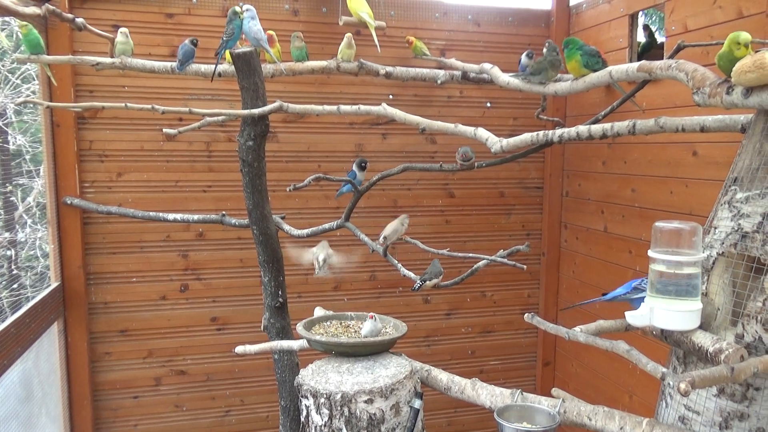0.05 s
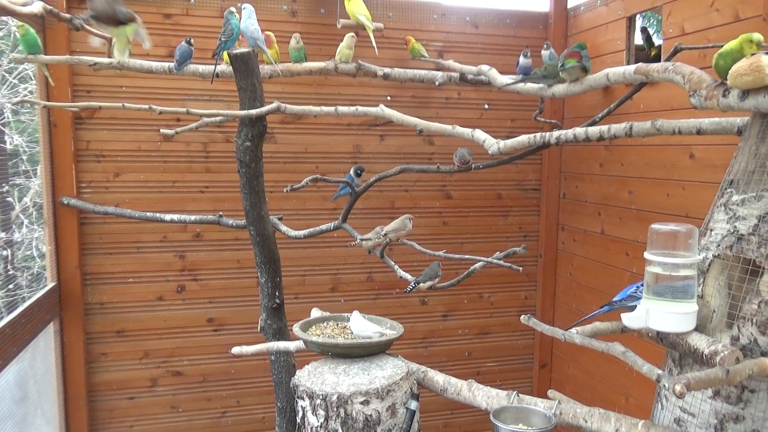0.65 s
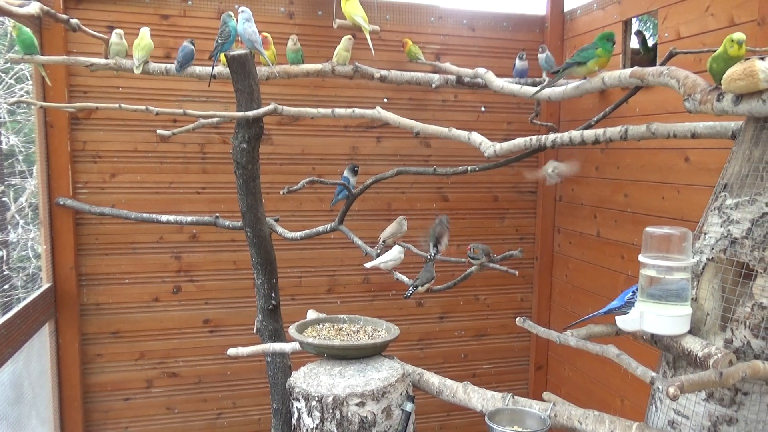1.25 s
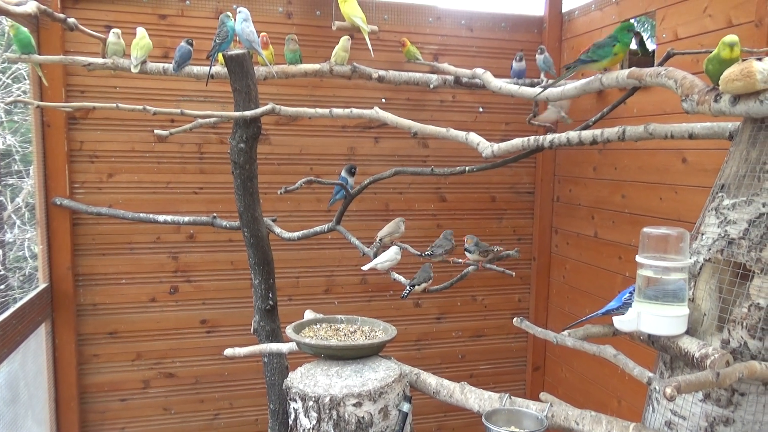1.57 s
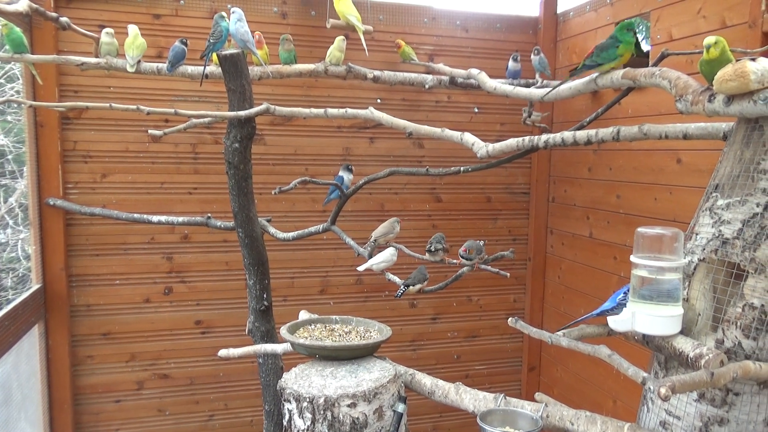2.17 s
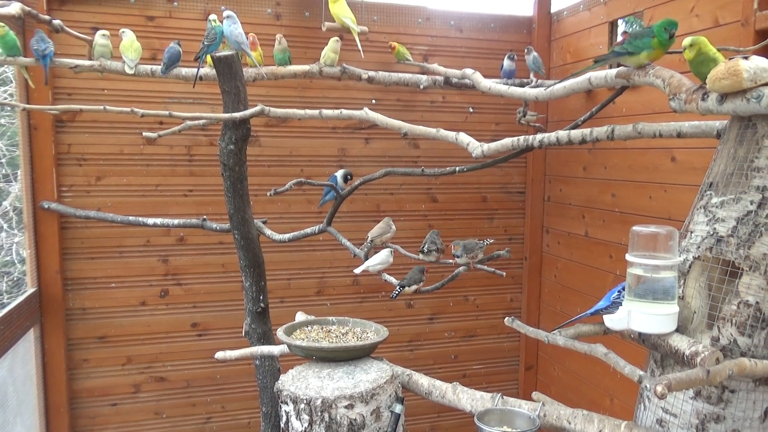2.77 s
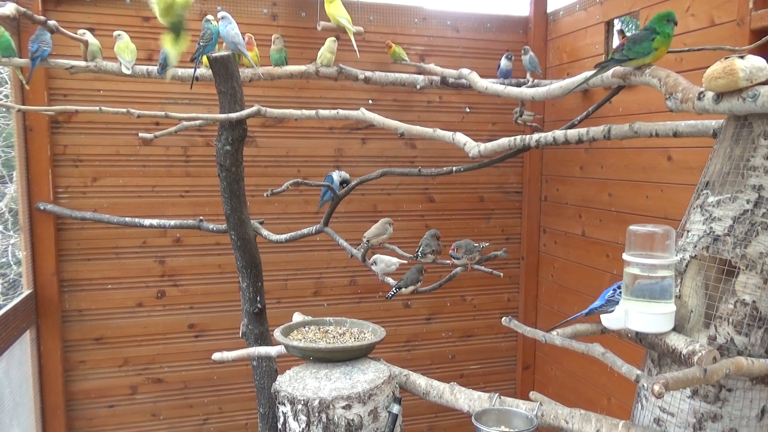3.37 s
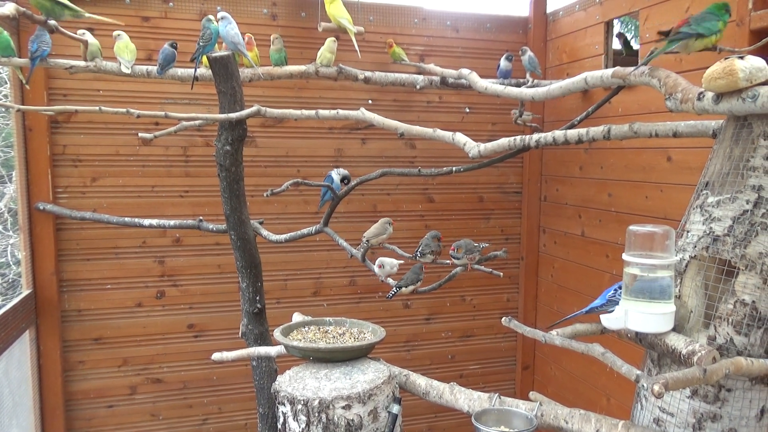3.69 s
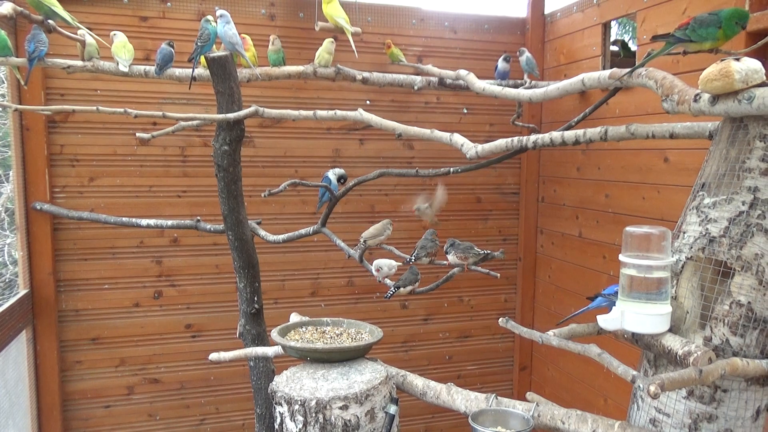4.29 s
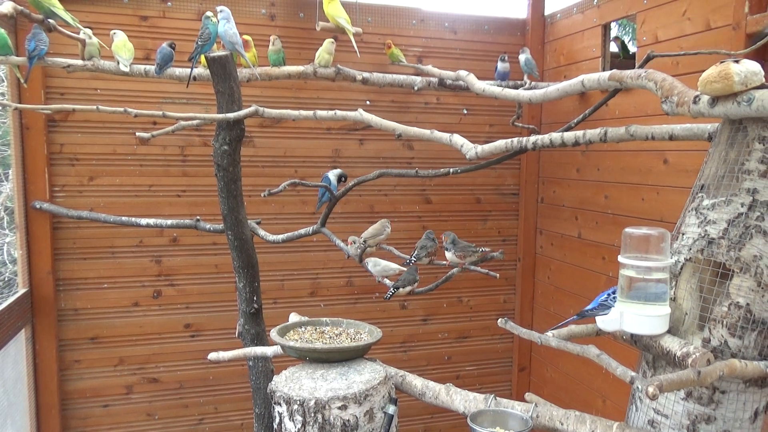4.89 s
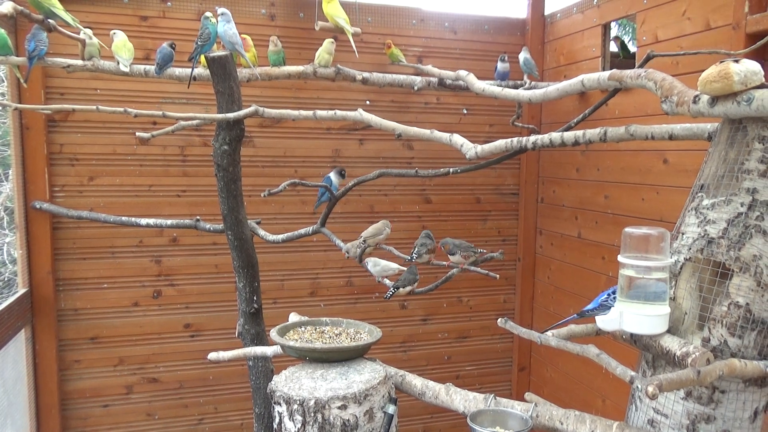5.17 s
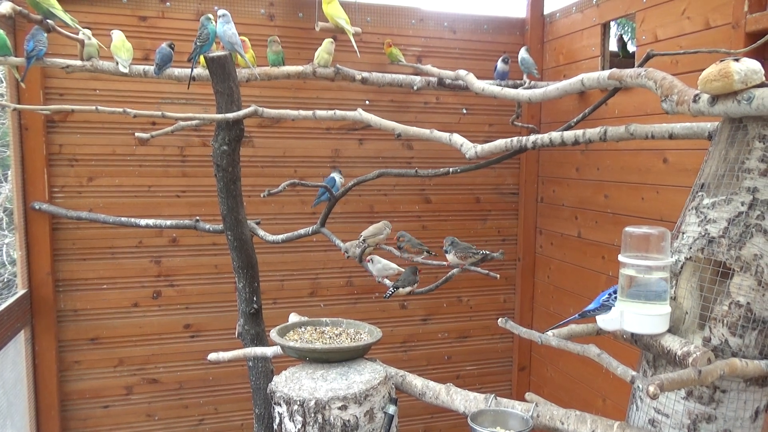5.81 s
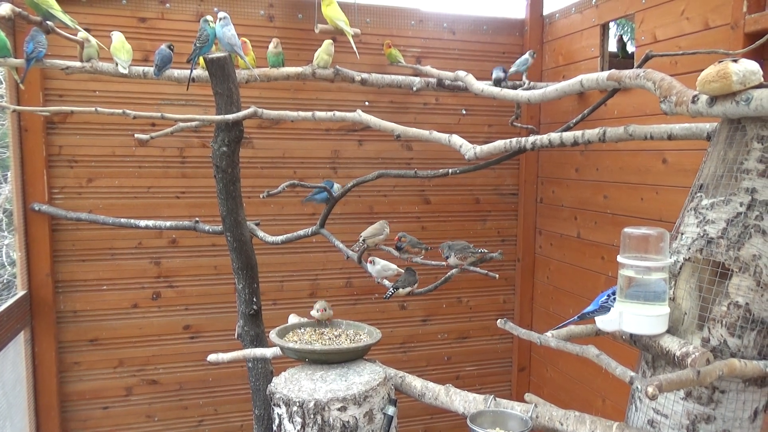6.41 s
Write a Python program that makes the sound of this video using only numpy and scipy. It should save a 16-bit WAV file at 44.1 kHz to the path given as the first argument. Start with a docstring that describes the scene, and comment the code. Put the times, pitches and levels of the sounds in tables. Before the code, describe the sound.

Budgerigars chirp, squeak and warble in a wooden aviary, with soft finch beeps, faint wing flutters and distant flock chatter.

```python
"""Budgerigars chatter in a wooden aviary, with a few small finches among them.
Each voice is a vibrating membrane heard through the throat: arched chirps turn rough as they fall,
squeaks flip up into shrill whistles, and rasps, nasal finch beeps, clucks and warbles come between.
Wings flutter, a finch lands in the seed dish, and the flock murmurs farther off in a soft hush of air.
The plank walls add a short bright ring."""
import sys
import numpy as np
from scipy import signal
from scipy.fft import rfft, irfft
from scipy.io import wavfile
from scipy.ndimage import uniform_filter1d, map_coordinates

SR = 44100
rng = np.random.default_rng(int(sys.argv[2]) if len(sys.argv) > 2 else 0)


def file_out(sig):
    """Save sig as 16-bit WAV at sys.argv[1]."""
    # one column per channel
    cols = np.atleast_2d(sig).T
    # limit, then scale
    lim = np.clip(cols, -1, 1)
    pcm = np.round(lim * 32767).astype(np.int16)
    wavfile.write(sys.argv[1], SR, pcm)


N = 293265
TIME = np.arange(N) / SR


def from_db(db):
    """Turn decibels into a number to multiply by."""
    return 10 ** (np.asarray(db) / 20)


def unit_power(x):
    """Scale a sound to an average power of 1."""
    return x / np.sqrt(np.mean(x ** 2) + 1e-20)


def at_hz(colour, hz):
    """Look up the level at a frequency in a tone colour table."""
    f, db = np.transpose(colour)
    return np.interp(np.log(np.maximum(hz, 1)), np.log(f), db)


def noise(colour):
    """Noise with the given tone colour, as long as the scene."""
    gain = from_db(at_hz(colour, np.fft.rfftfreq(N, 1 / SR)))
    return unit_power(irfft(rfft(rng.standard_normal(N)) * gain, N))


def drift(rate, t):
    """A smooth random wobble that changes `rate` times a second."""
    return map_coordinates(rng.standard_normal(8192), [(t - t[0]) * rate], order=2, mode="wrap")


def gate(t, start, end, rise, fall):
    """Fade in before the start and fade out after the end."""
    ramp = np.minimum((t - start) / rise + 1, (end - t) / fall + 1)
    return np.sin(np.pi / 2 * np.clip(ramp, 0, 1)) ** 2


def around(start, end):
    """The sample times of a note, with a little extra on both sides."""
    return TIME[max(0, int((start - .02) * SR)):int((end + .02) * SR)]


def add(track, t, sound):
    """Mix a sound into a track at its own time."""
    first = round(t[0] * SR)
    track[first:first + len(t)] += sound


def voice_box(t, hz, rough, throat, buzz_hz, swing, flutter, waver, count, bright_db=0):
    """A membrane vibrates; a slower, uneven buzz shakes its pitch (swing) and strength (flutter)."""
    buzz = np.sin(2 * np.pi * np.cumsum(buzz_hz * (1 + 0.3265 * drift(250, t))) / SR)
    shake = rough * (1.61 * buzz + 0.725 * drift(1100, t))
    phase = 2 * np.pi * np.cumsum(hz * (1 + swing * shake + waver * drift(171.65, t))) / SR
    k = np.arange(1, count + 1)[:, None]   # 1 is the note itself, the rest are its overtones
    # the throat favours some overtones; the total power stays even
    gains = from_db(at_hz(throat, k * hz) + bright_db * (k > 1)) * (k * hz < .45 * SR)
    gains /= np.sqrt(np.sum(gains ** 2, axis=0) / 2)
    tone = np.sum(gains * np.sin(k * phase + rng.uniform(0, 2 * np.pi, (count, 1))), axis=0)
    return tone * unit_power(np.exp(flutter * shake))


# Tone colour of a chirping throat: f/Hz, level/dB
CHIRP_THROAT = [(4000, 3), (5500, -9), (7700, -9), (9500, -19.5), (11700, -13), (13500, -31), (16000, -24),
                (19000, -65)]
# Budgerigar chirps: t/s, rise/s, fall/s, tail/s, top f/Hz, low f/Hz,
# top level/dB, fall level/dB, tail level/dB, hoarseness/0-1, overtone boost/dB
CHIRPS = [ (0.0, 0.08, 0.046, 0.057, 3878, 2960, -20.5, -19, -20, 0.4, 3),
          (0.514, 0.025, 0.081, 0.06, 3890, 2777, -24, -21, -18, 0.84, -7),
          (0.808, 0.05, 0.059, 0.019, 3932, 2903, -15.5, -15.5, -28, 0.04, -2.5),
          (1.095, 0.031, 0.074, 0.0045, 4037, 3000, -20, -24, -34, 0, -2),
          (1.438, 0.0074, 0.065, 0.068, 3820, 2604, -32.5, -23.5, -24.5, 0.4, 5),
          (1.525, 0.051, 0.047, 0.019, 3830, 2840, -19, -20, -21, 0.09, -1),
          (1.828, 0.048, 0.093, 0.08, 4045, 2780, -21, -21, -25.5, 0.05, 0.5),
          (2.25, 0.053, 0.031, 0.0117, 3912, 2740, -18, -28, -12, 0.18, 0.5),
          (2.435, 0.022, 0.051, 0.026, 3750, 3034, -29, -28.5, -23, 0.66, 4),
          (2.491, 0.017, 0.046, 0.13, 4390, 2843, -25, -21.5, -25.5, 0.46, 6),
          (2.535, 0.059, 0.059, 0.018, 3992, 3397, -20.5, -22.5, -23, 0.35, -0.5),
          (2.657, 0.015, 0.044, 0.0029, 4640, 4350, -16, -23, -60, 0.12, 5),
          (2.725, 0.006, 0.046, 0.059, 3825, 2766, -26.5, -17, -18, 0, -1.5),
          (2.897, 0.042, 0.074, 0.066, 3914, 2427, -12.5, -20, -31.5, 0.06, 0.5),
          (3.064, 0.0088, 0.055, 0.081, 4150, 2784, -42.5, -24.5, -21, 0.45, 0.5),
          (3.337, 0.0087, 0.06, 0.079, 3763, 2603, -30.5, -23, -23.5, 0.15, -1),
          (3.868, 0.016, 0.084, 0.019, 4670, 2928, -13, -22, -18.5, 0.48, 1.5),
          (4.017, 0.033, 0.06, 0.0097, 3943, 2920, -19.5, -21.5, -28.5, 0.28, -2),
          (4.253, 0.0067, 0.058, 0.058, 4070, 2684, -28.5, -33.5, -25, 0.24, 2.5),
          (4.706, 0.0131, 0.056, 0.05, 3627, 2785, -31, -26.5, -25, 0.59, 2.5),
          (4.91, 0.011, 0.081, 0.0029, 3504, 2640, -33.5, -41, -44, 0.4, 3.5),
          (5.951, 0.026, 0.011, 0.11, 3840, 2700, -33.5, -46, -35, 0.07, 6.5),
          (6.057, 0.0077, 0.049, 0.037, 3606, 2810, -40, -32, -45, 0.54, 6.5),
          (6.539, 0.043, 0.051, 0.039, 3905, 2860, -23, -20.5, -31, 0.12, -1.5)]


def chirps(crack_hz=3330, trill_hz=160.1):
    """The voice climbs to a clear top, cracks on the way down, then lingers low and rough."""
    out = np.zeros(N)
    for s, rise, fall, tail, top, low, top_db, fall_db, tail_db, hoarse, edge_db in CHIRPS:
        peak, trough, end = s + rise, s + rise + fall, s + rise + fall + tail
        t = around(s, end)
        up = np.clip((t - s) / rise, 0, 1)
        down = np.clip((t - peak) / fall, 0, 1)
        linger = np.clip((t - trough) / tail, 0, 1)
        scoop = 0.21 * np.tanh(rise / 0.026) ** 2   # quicker rises start nearer the top
        arch = top * (1 - scoop * (1 - up) ** 2.6) + (low - top) * np.sin(np.pi / 2 * down) ** 2
        pitch = arch + low * (0.098 * np.sin(np.pi * linger) ** 2 + 0.0324 * linger)
        level = np.interp(t, [s, s + 0.45 * rise, peak, peak + fall / 2, trough, trough + tail / 2, end],
                          [top_db - 11, top_db, top_db, fall_db, tail_db - 4, tail_db, tail_db - 11])
        rough = np.interp(t, [s, peak, peak + fall / 2, trough], [hoarse, 0.24 * hoarse, 0.2, 0.18])
        crack = np.sin(np.pi * down) * np.exp(-((pitch - crack_hz) / 150) ** 2)
        # louder and higher is brighter; the fall is duller
        bright_db = edge_db + 0.033 * (level + 4.5) + 5 * (.5 - down) + 11 * np.log2(pitch / 3700)
        # the low end throbs in pitch and level
        trill = down ** 2 * np.sin(2 * np.pi * trill_hz * t + drift(trill_hz / 2, t))
        voice = voice_box(t, pitch * (1 + 0.03 * trill), 0.6 * rough + 0.34 * crack, CHIRP_THROAT,
                          buzz_hz=525.4, swing=0.26, flutter=0.021, waver=0.01507, count=5,
                          bright_db=bright_db)
        gain = from_db(level + 1.5 * trill + 12 * rough * drift(124.7, t))
        add(out, t, voice * gain * gate(t, s, end, 0.009, 0.0047))
    return out


# Tone colour of the background air: f/Hz, level/dB
AIR = [(25, -6.5), (90, 7), (190, -8), (1500, -7), (3800, -11), (10000, -37), (18000, -40)]


def air(level_db=-56):
    """A steady, soft hush, a little louder on the right."""
    sides = np.array([[1], [-1]])
    return from_db(level_db) * (noise(AIR) * from_db(-1.2 * sides) + 0.17 * noise(AIR) * sides)


# Tone colour of a warbling throat: f/Hz, level/dB
WARBLE_THROAT = [(250, -24.5), (1800, -1.5), (3200, -7.5), (5000, -25), (9000, -19), (15000, -62)]


def warble(t, hz, rough):
    """The throaty, buzzing voice of a budgerigar's song, near or far."""
    return voice_box(t, hz, rough, WARBLE_THROAT,
                     buzz_hz=331.4, swing=0.203, flutter=0.6, waver=0.0143, count=4)


# Tone colour of blurred, distant chatter: f/Hz, level/dB
MURMUR = [(250, -14.5), (1000, -9.5), (2000, -24.5), (5000, -13), (10000, -21.5), (15000, -41)]
# How the distant flock swells and fades: t/s, level/dB
FLOCK_LEVELS = [(0, -51), (1.75, -56.5), (3.55, -47), (3.85, -56), (4.9, -53), (5.35, -66), (5.5, -60.5),
                (6.1, -50.5), (6.4, -53.5)]


def far_flock(notes=170):
    """Distant birds warble short random glides over a blur of chatter."""
    song = np.zeros(N)
    for when, length, pitch, loud, rough in rng.random((notes, 5)):
        s = when * TIME[-1]
        t = around(s, s + 0.06 * length)
        hz = 1100 * 2.6 ** pitch * np.exp(0.13 * drift(45.98, t))
        add(song, t, warble(t, hz, 0.706 * rough) * np.hanning(len(t)) * from_db(5 * loud))
    blur = unit_power(noise(MURMUR) * from_db(5 * np.tanh(drift(28, TIME))))
    swell = from_db(np.interp(TIME, *np.transpose(FLOCK_LEVELS)))
    return (from_db(-4.5) * blur + from_db(-3.5) * unit_power(song)) * swell


# Tone colour of a whistling throat: f/Hz, level/dB
WHISTLE_THROAT = [(5000, 10), (7000, -10.5), (10300, 11.5), (12400, -13.5), (14000, -35.5)]


def whistle(track, s, length, first, last, db, rough, leap=0, settle_s=0.011):
    """Add a high, nearly pure tone with its octave; it settles quickly toward its last pitch."""
    t = around(s, s + length)
    pitch = last + (first - last) * np.exp(-np.maximum(t - s, 0) / settle_s)
    pitch *= 1 - leap * np.clip((s - t) / 0.0022 + .5, 0, 1)   # a leap shoots up from below
    voice = voice_box(t, pitch, rough, WHISTLE_THROAT,
                      buzz_hz=400.3, swing=0.11, flutter=0.21, waver=0.0111, count=2)
    add(track, t, voice * from_db(db) * gate(t, s + 0.00033, s + length - .004, 0.003, 0.0091))


# Shrill pips: t/s, length/s, first f/Hz, last f/Hz, level/dB, roughness/0-1
PIPS = [(0.15, 0.039, 5100, 6870, -30, 0.4), (2.449, 0.034, 5770, 5200, -29, 0.42),
        (2.634, 0.018, 4900, 5900, -31, 0), (3.886, 0.015, 5780, 6500, -14.5, 0.6),
        (4.234, 0.013, 6160, 5530, -20, 0.48), (4.295, 0.026, 6500, 4700, -23, 0.21),
        (5.779, 0.019, 5550, 4670, -49, 0.02), (6.33, 0.014, 5420, 5110, -21.5, 0.08)]


def pips():
    """Tiny whistles on their own, each bending up or down."""
    out = np.zeros(N)
    for pip in PIPS:
        whistle(out, *pip)
    return out


# Tone colours of a rasp's shrill part and throaty part: f/Hz, level/dB
RASP_SHRILL = [(1000, -18), (2200, -10), (4000, 1), (6500, 4), (12000, -6.5), (14500, -12.5), (19000, -46)]
RASP_THROATY = [(700, -30), (2000, -5.5), (3600, 1.5), (12000, -84)]
# Scolding rasps: t/s, length/s, shrill level/dB, throaty level/dB
RASPS = [(0.163, 0.037, -29.5, -58), (0.253, 0.028, -27, -37), (0.766, 0.016, -23.5, -40.5),
         (0.888, 0.043, -28, -40.5), (1.055, 0.04, -31, -45), (3.467, 0.024, -39, -34),
         (3.905, 0.021, -23.5, -51), (4.066, 0.018, -28, -42), (5.108, 0.006, -57, -48.5),
         (5.517, 0.01, -46.5, -41.5)]


def rasps(squeal_hz=2200):
    """A forced squeal whose pitch jumps about, wrapped in hiss."""
    out, hiss, throaty = np.zeros(N), noise(RASP_SHRILL), noise(RASP_THROATY)
    for s, length, shrill_db, throaty_db in RASPS:
        t = around(s, s + length)
        squeal = voice_box(t, squeal_hz * np.exp(0.1 * drift(330, t)), 0.17, RASP_SHRILL,
                           buzz_hz=668, swing=0.065, flutter=0.2, waver=0.018, count=7)
        shrill = from_db(-3.5) * squeal + from_db(-8) * np.interp(t, TIME, hiss)
        rasp = from_db(shrill_db) * shrill + from_db(throaty_db) * np.interp(t, TIME, throaty)
        add(out, t, rasp * from_db(2 * drift(164, t)) * gate(t, s + 0.01, s + length, 0.037, 0.018))
    return out


# Tone colour of air pushed by wings: f/Hz, level/dB
WING_RUSH = [(50, 3), (250, 0), (800, 0), (2500, -8.5), (15000, -36)]
# Short flights: t/s, length/s, rush level/dB, whirr level/dB
FLIGHTS = [(0.203, 0.032, -53.5, -82), (1.223, 0.33, -54.5, -61.5), (3.168, 0.73, -59, -62),
           (4.735, 0.022, -57.5, -75)]


def wings(beat_hz=19, whirr_hz=275):
    """Each wingbeat pushes a puff of air and sets the feathers whirring low."""
    beat = 2 * np.pi * np.cumsum(beat_hz * (1 + 0.178 * drift(3.7, TIME))) / SR
    rush, shiver = noise(WING_RUSH), drift(70, TIME)
    whirr = shiver * np.sin(2 * np.pi * np.cumsum(whirr_hz * np.exp(.13 * drift(70, TIME))) / SR)
    flying = np.zeros(N)
    for s, length, rush_db, whirr_db in FLIGHTS:
        fade = gate(TIME, s + 0.016, s + length - .12, 0.028, 0.52)
        flying += (from_db(rush_db) * rush + from_db(whirr_db) * whirr) * fade
    return unit_power(from_db(3.0 * np.sin(beat))) * flying


# Tone colour of the seed dish: f/Hz, level/dB
SEED_DISH = [(90, -12), (650, 5), (1200, -20), (5000, -64)]


def landing(start_s=0.23, fade_db_per_s=500):
    """A finch's feet hit the seed dish with a dull knock that dies away at once."""
    age = TIME - start_s
    return noise(SEED_DISH) * (age > 0) * from_db(-43.5 - fade_db_per_s * np.abs(age))


# Tone colours of a squeaking throat and of the soft thump at the flip: f/Hz, level/dB
SQUEAK_THROAT = [(2200, -2), (3300, -10.5), (4700, 6), (7000, 4.5), (9300, -0.5), (11800, 0.5),
                 (14000, -14), (18000, -33)]
FLIP_THUMP = [(30, 7), (110, -2), (300, -1.5), (700, -2), (2000, -72)]
# Squeaks: t/s, slide length/s, first f/Hz, bend f/Hz, last f/Hz, slide level/dB,
# whistle length/s, whistle f/Hz, whistle level/dB, whistle roughness/0-1
SQUEAKS = [ (0.272, 0.037, 2310, 2417, 2500, -24, 0.037, 6170, -25.5, 0.27),
           (0.458, 0.033, 2270, 2360, 2326, -22, 0.032, 6410, -13.5, 0.1),
           (0.69, 0.027, 2000, 2340, 2600, -23, 0.025, 6297, -11, 0.19),
           (0.818, 0.031, 2705, 2530, 2484, -21.5, 0.013, 6270, -12.5, 0.17),
           (0.95, 0.026, 2650, 2496, 2550, -25, 0.014, 6097, -16.5, 0),
           (1.094, 0.033, 2390, 2327, 2410, -26.5, 0.024, 6070, -19.5, 0.18),
           (4.003, 0.026, 2200, 2407, 2580, -21, 0.021, 7070, -17, 0),
           (4.132, 0.031, 2220, 2447, 2517, -21.5, 0.022, 7100, -15, 0.01),
           (4.492, 0.03, 2232, 2344, 2460, -20.5, 0.046, 6830, -19.5, 0.27),
           (5.446, 0.0061, 1900, 2000, 2170, -45, 0.019, 6830, -27, 0.06),
           (6.301, 0.02, 2260, 2034, 2576, -22.5, 0.051, 6690, -26.5, 0.25)]


def squeaks():
    """The voice starts scratchy, slides, then breaks up as it flips into a shrill whistle."""
    out, thump = np.zeros(N), from_db(-22.5) * noise(FLIP_THUMP)
    for s, slide_s, first, bend, last, db, whistle_s, whistle_hz, whistle_db, rough in SQUEAKS:
        flip = s + slide_s
        t = around(s, flip)
        pitch = np.interp(t, [s, s + 0.33 * slide_s, flip], [first, bend, last])
        breaking = np.exp(-np.abs(t - flip) / 0.0044)
        scratch = 0.4 * np.exp(-np.maximum(t - s, 0) / 0.0038) + 0.076 * breaking
        voice = voice_box(t, pitch, 0.22 + scratch, SQUEAK_THROAT,
                          buzz_hz=442.8, swing=0.076, flutter=0.44, waver=0.0057, count=7)
        voice += breaking * np.interp(t, TIME, thump)
        add(out, t, voice * from_db(db) * gate(t, s + 0.0014, flip + 0.00037, 0.0057, 0.003))
        whistle(out, flip, whistle_s, 1.0049 * whistle_hz, whistle_hz, whistle_db, rough, leap=0.16)
    return out


# Tone colour of a finch's throat: f/Hz, level/dB
FINCH_THROAT = [(450, -3), (1200, -2.5), (2400, -0.5), (3900, 15.5), (5200, 6), (7000, -3.5), (9000, -13.5),
                (11000, 1), (13500, -23)]
# Nasal finch beeps: t/s, length/s, f/Hz, level/dB, roughness/0-1
BEEPS = [(1.278, 0.06, 867, -49.5, 0.73), (1.369, 0.1, 786, -49.5, 0.37), (3.299, 0.053, 447, -57.5, 0.3),
         (3.61, 0.097, 782, -43.5, 0.16), (3.731, 0.043, 799, -48, 0.65), (5.233, 0.064, 623, -64.5, 0),
         (5.789, 0.043, 850, -54, 0.2), (6.098, 0.098, 1036, -53, 0.2)]


def finch_beeps():
    """Finches call on a low, gently arched pitch, with many overtones and a husky hiss."""
    out, husk = np.zeros(N), from_db(-5) * noise(FINCH_THROAT)
    for s, length, hz, db, rough in BEEPS:
        t = around(s, s + length)
        arch = 1 - 0.054 * (2 * (t - s) / length - 1.1) ** 2 + 0.006 * drift(58, t)
        voice = voice_box(t, hz * arch, rough, FINCH_THROAT,
                          buzz_hz=140, swing=.03, flutter=.5, waver=.005, count=32)
        voice += np.sqrt(rough) * np.interp(t, TIME, husk)
        add(out, t, voice * from_db(db) * gate(t, s + 0.015, s + length - .01, 0.046, 0.02))
    return out


# Faint low clucks: t/s, level/dB
CLUCKS = [(1.715, -55), (1.80, -53.5), (1.909, -56), (1.999, -59.5), (2.187, -57), (2.595, -54.5),
          (2.75, -57)]


def clucks(start_hz=470, glide_per_s=6):
    """Soft, hollow, hoarse notes slide up in a throaty flutter."""
    out = np.zeros(N)
    for s, db in CLUCKS:
        t = around(s, s + 0.0414)
        pitch = start_hz * np.exp(glide_per_s * (t - s) + 0.1445 * drift(199.3, t))
        phase = 2 * np.pi * np.cumsum(pitch) / SR
        voice = np.sin(phase) + 0.86 * np.sin(2 * phase) + 0.22 * np.sin(3 * phase)
        add(out, t, voice * from_db(db + 5.6 * drift(148, t)) * gate(t, s, s + 0.023, 0.0088, 0.011))
    return out


# Warbled notes between the calls: t/s, length/s, first f/Hz, last f/Hz, level/dB, roughness/0-1
WARBLES = [(2.06, 0.087, 2566, 2740, -36, 0.23), (2.796, 0.067, 2535, 2130, -31, 0.21),
           (3.28, 0.14, 1980, 2314, -39.5, 0.11), (3.523, 0.06, 4570, 3390, -35.5, 0.22),
           (4.982, 0.038, 2120, 1520, -45, 0.53), (5.095, 0.02, 2580, 2850, -35, 0.07),
           (5.657, 0.044, 1900, 2690, -46.5, 0.34), (5.679, 0.044, 1486, 1753, -45.5, 0.48),
           (5.776, 0.0072, 3410, 3540, -36, 0), (5.835, 0.073, 2017, 2540, -43.5, 0.6),
           (5.929, 0.015, 4070, 3480, -35.5, 0.1)]


def near_warbles():
    """Nearby budgerigars sing single notes that glide up or down."""
    out = np.zeros(N)
    for s, length, first, last, db, rough in WARBLES:
        t, middle = around(s, s + length), s + length / 2
        voice = warble(t, np.interp(t, [s, s + length], [first, last]), rough)
        add(out, t, voice * from_db(db) * gate(t, middle, middle, length * 1.27, length * 0.82))
    return out


def aviary(x, pan_db, echo_db, width, planks_db=3, ring_s=0.21):
    """Sound arrives directly, then bounces off the planks and rings briefly; pan_db > 0 is left."""
    t = TIME[:SR // 2]
    ring = rng.standard_normal((2, len(t))) * from_db(-60 * t / ring_s)
    planks = rng.standard_normal((2, len(t))) * (rng.random(len(t)) < 900 / SR) * np.exp(-t / 0.0028)
    late = t > .003
    echoes = unit_power(ring * late) + from_db(planks_db) * unit_power(planks * late)
    echoes = from_db(echo_db) * unit_power(echoes) / np.sqrt(len(t))
    mid, side = signal.fftconvolve(x[None], echoes, axes=1)[:, :N]
    sides = np.array([[1], [-1]])
    return (x + mid) * from_db(sides * pan_db / 2) + width * side * sides


def scene():
    """Set each group's loudness and place: chirps central, shrill calls a bit left, the rest right."""
    budgies = aviary(chirps() + near_warbles(), pan_db=-0.4, echo_db=0.1, width=0.2, planks_db=1.0)
    calls = squeaks() + pips() + from_db(5.5) * rasps()
    shrill = aviary(calls, pan_db=1.0, echo_db=-1.0, width=0.23, planks_db=-0.5)
    stirring = clucks() + wings() + landing() + far_flock()
    bustle = from_db(6.5) * aviary(stirring, pan_db=-2.5, echo_db=-8.0, width=0.33)
    finches = from_db(11.0) * aviary(finch_beeps(), pan_db=-1.0, echo_db=1.5, width=0.14)
    return budgies + shrill + finches + bustle + air()


def record(dry, ceiling_db=-16.0, release_db_per_s=70, cutoff_hz=18300):
    """A limiter turns the loudest calls down and recovers quickly; the highest treble is cut."""
    power = uniform_filter1d(np.mean(dry ** 2, axis=0), size=220)
    over_db = np.maximum(10 * np.log10(np.abs(power) + 1e-12) - ceiling_db, 0)
    held_db = np.maximum.accumulate(over_db + release_db_per_s * TIME) - release_db_per_s * TIME
    limited = dry * from_db(-uniform_filter1d(held_db, size=130))
    return signal.sosfilt(signal.ellip(10, .2, 80, cutoff_hz, fs=SR, output="sos"), limited)


dry = scene()
out = record(dry)
file_out(out)
```